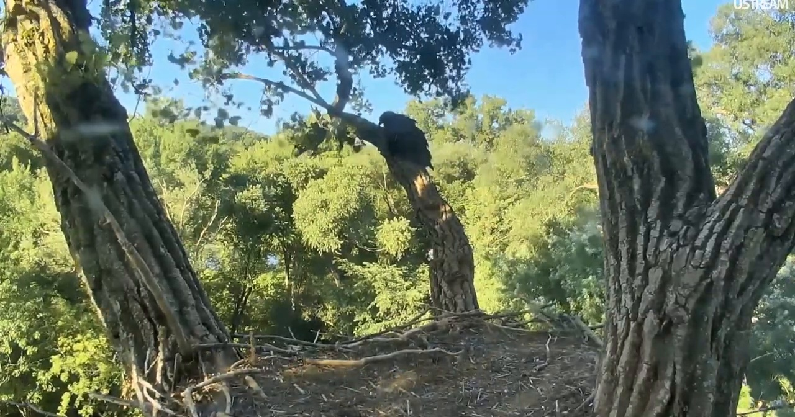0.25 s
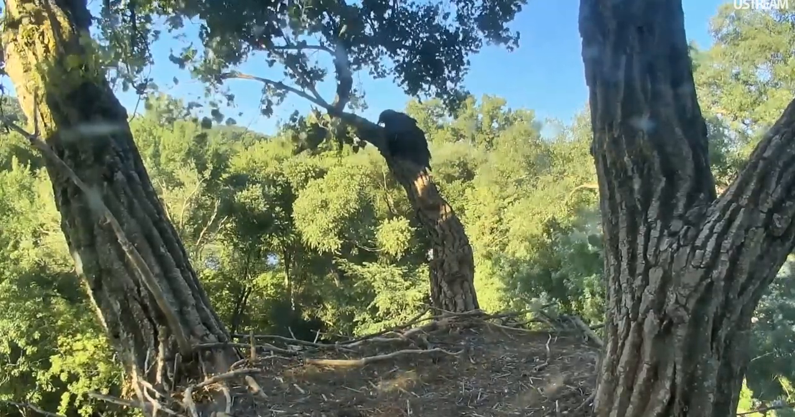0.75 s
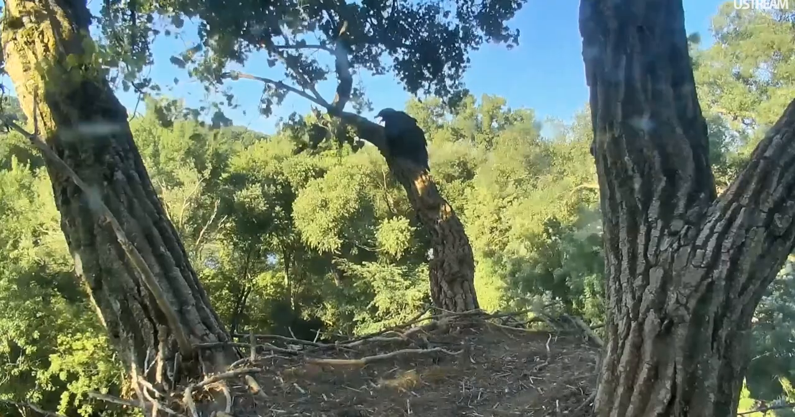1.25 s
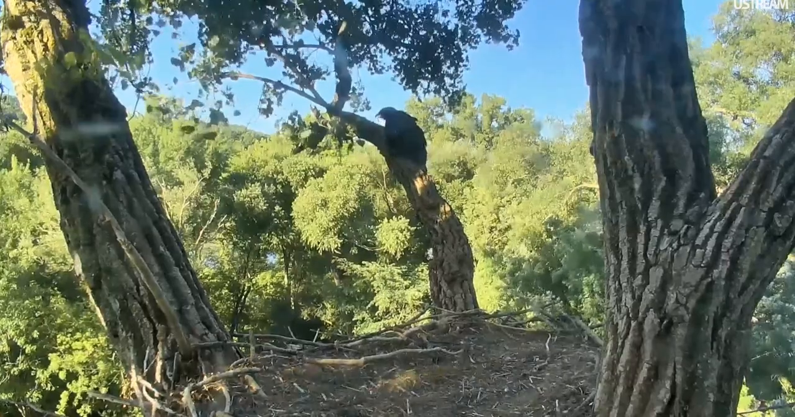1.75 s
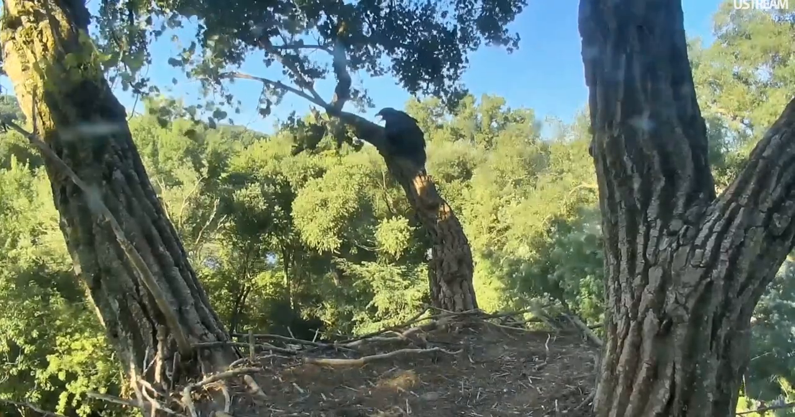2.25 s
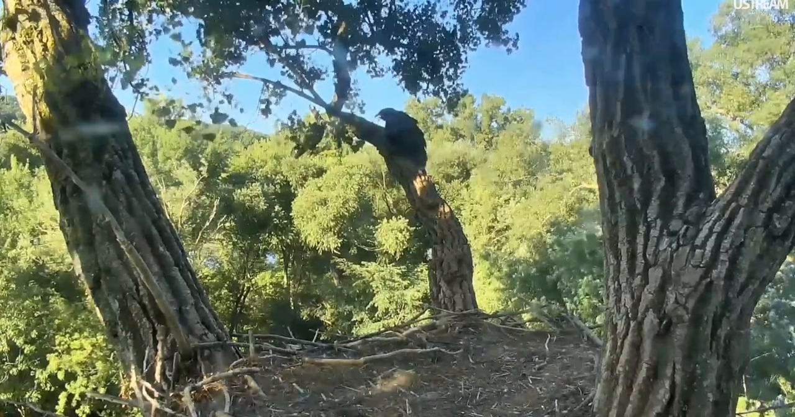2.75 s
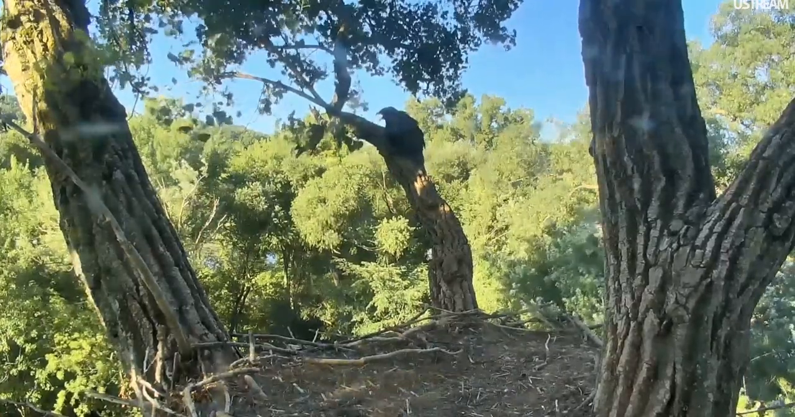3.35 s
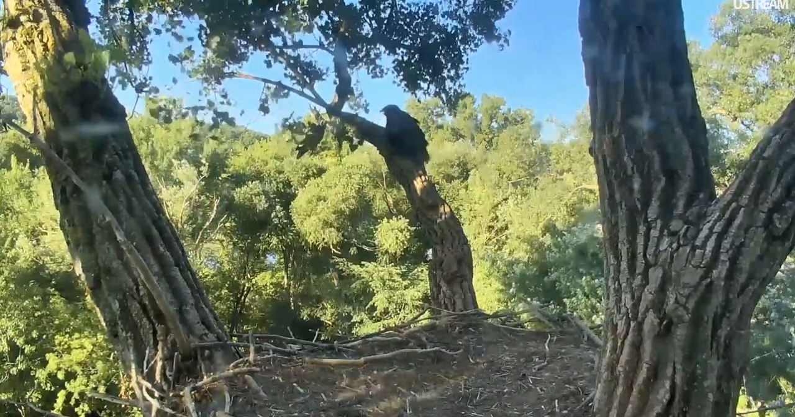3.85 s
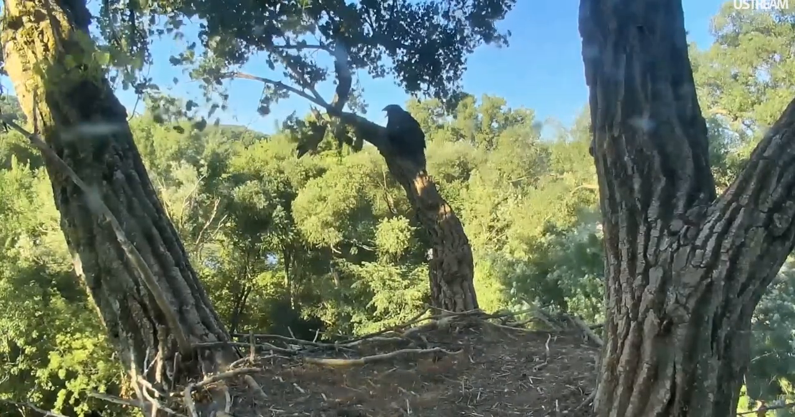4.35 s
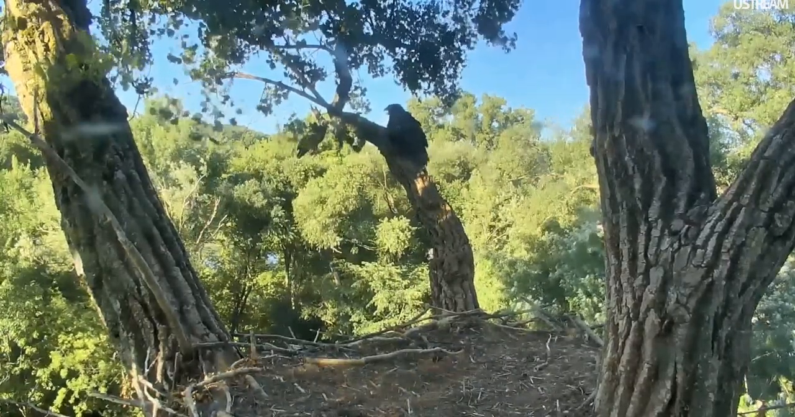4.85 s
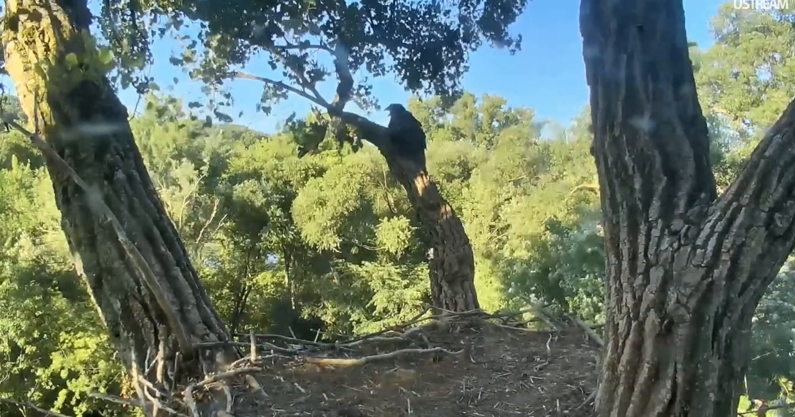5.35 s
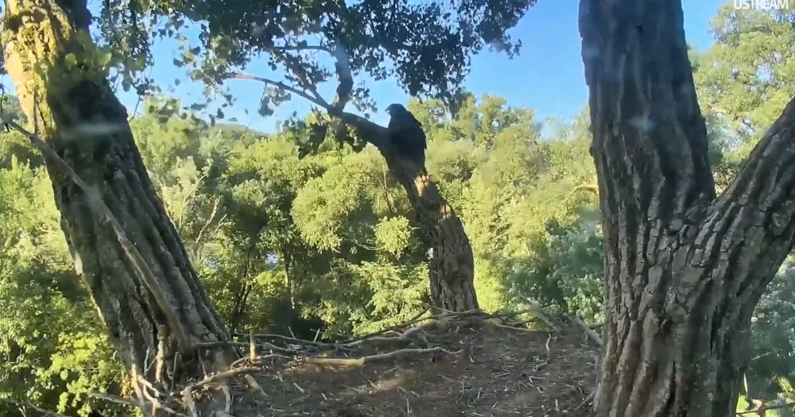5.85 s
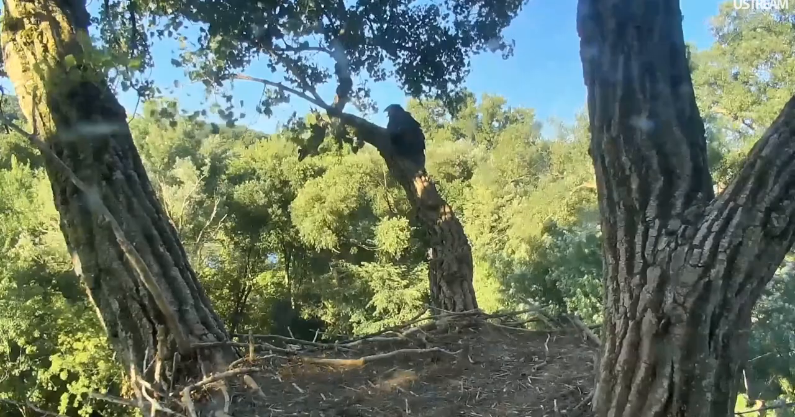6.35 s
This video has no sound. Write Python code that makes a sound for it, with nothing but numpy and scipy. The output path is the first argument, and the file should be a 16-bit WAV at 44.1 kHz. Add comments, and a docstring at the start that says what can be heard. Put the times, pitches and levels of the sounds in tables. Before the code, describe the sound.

From 0 to about 6.5 seconds, a small outdoor camera microphone hears constant broad airy hiss and a breathy, whistling hum near 1.7 kHz, wavering slightly and rising slowly, over a barely perceptible low drone. Young eagles beg from a nearby tree in alternating calls. Very short chips drop from just under 4 kHz at about 0.1, 0.9, 1.5, 2.1, 2.8, 3.5, 4.2, 4.9 and 5.8 seconds. Squeals answer at 0.4, 1.1, 1.7, 2.3, 3.0, 3.7, 4.4, 5.2 and 6.1, each 0.1 to 0.27 seconds, scooping upward into a thin held note near 3.9 kHz, then fading. Some are rough, others cleaner; the chip at 1.5 is loudest, and the last squeal is weak. Branches and farther trees return a soft half-second echo. Low-quality sampling adds gritty, metallic mirrored treble above the calls and hiss.

```python
"""At a nest, a camera's microphone hears broad outdoor air; its cavity rings as a whistling hum, over a faint low drone.
Young eagles beg from a tree near by: first a short falling chip, then a rising squeal, and so on in turn.
Each call comes direct and is then echoed by nearby branches and the trees beyond.
Last, the camera samples at 8 kHz: notes above 4 kHz fold back down, and the band is mirrored in the treble."""
import sys
import numpy as np
from scipy import signal
from scipy.fft import rfft, irfft, next_fast_len
from scipy.io import wavfile
from scipy.ndimage import map_coordinates

SR = 44100
rng = np.random.default_rng(int(sys.argv[2]) if len(sys.argv) > 2 else 0)


def wrap_up_sound(samples):
    """Save the sound to the file named by the first command line argument, as 16-bit audio."""
    columns = np.atleast_2d(samples).T
    # keep every value between -1 and 1, then stretch to whole-number steps
    tamed = np.clip(columns, -1, 1)
    steps = np.round(tamed * 32767).astype(np.int16)
    wavfile.write(sys.argv[1], SR, steps)


N = 291501

# Colour of the outdoor air at the microphone: (frequency [Hz], relative density [dB per Hz])
AIR_COLOUR = [(20, -21), (60, -16.5), (150, -12.5), (450, -11), (1000, -6.5), (1400, -2), (2000, 0.5),
              (2450, 0), (3000, -0.5), (3400, -2), (3750, -5.5), (4000, -8.5)]
# Chips, before the echo: (time [s], lead-in [s], fall [s], top pitch [Hz], end pitch [Hz],
#   crest level [dB], end level [dB], roughness [ratio])
CHIP_CALLS = [ (0.143, 0.0057, 0.0156, 3810, 3280, -35.5, -38.5, 0.92),
              (.869, 0.01, 0.014, 3900, 2780, -25.5, -32, 0.44),
              (1.508, .008, .018, 3900, 2616, -18.5, -30, 0.26),
              (2.106, .019, 0.018, 3880, 2840, -27.5, -35, 0.65),
              (2.777, .007, 0.0151, 3850, 3270, -26, -31, 0.8),
              (3.493, 0.00593, 0.013, 3756, 2850, -29.5, -30, 0.65),
              (4.168, 0.0062, .013, 3700, 2880, -33, -34.5, .6),
              (4.915, 0.0069, .028, 3650, 2380, -35, -34, 0.83),
              (5.757, 0.0056, 0.029, 3650, 2323, -35, -31.5, .65)]
# Squeals, before the echo: (time [s], scoop [s], whole length [s], start pitch [Hz], break pitch [Hz],
#   held pitch [Hz], settling time constant [s], crest position [share of the held note],
#   second harmonic in the scoop [dB], its crest in the held note [dB], fundamental in the scoop [dB],
#   scoop roughness [ratio], held roughness [ratio])
SQUEAL_CALLS = [ (0.369, .012, .19, 1540, 1848, 1999, .028, 0.44, -45, -33.5, -60, 0.4, 0.3),
                (1.101, .012, .16, 1503, 1600, 1925, .03, 0.19, -37, -42, -60, 1.1, 1.15),
                (1.673, .013, .27, 1328, 1446, 1927, .004, 0.46, -34, -36, -56, .85, .4),
                (2.317, 0.017, .1, 1406, 1641, 1950, 0.0074, 0.55, -26, -39.5, -53, 0.18, .55),
                (3.011, 0.021, .15, 1418, 1773, 1905, 0.033, 0.61, -32.5, -28, -55, 0.23, 0.22),
                (3.717, 0.049, .12, 1610, 1697, 1938, .015, .25, -36.5, -41.5, -54, 0.3, 0.9),
                (4.406, .048, 0.22, 1531, 1802, 1960, 0.00497, .25, -37.5, -39.5, -29.5, 0.22, 0.42),
                (5.196, .048, 0.17, 1658, 1773, 1946, .012, .2, -39, -41.5, -25.5, 0.2, 0.2),
                (6.126, 0.029, 0.24, 1610, 1873, 1977, .02, .45, -44.5, -44.5, -60, 0.3, 0.42)]
# Echo of the trees beyond: (frequency [Hz], time to decay by 60 dB [s])
FAR_TREES_T60 = [(1000, 0.28), (2500, 0.54), (4000, 0.65)]

AIR_DB, HUM_START_DB, DRONE_DB = -40.5, -38.5, -71  # background rms levels
HUM_RISE_DB_PER_S = 0.26
DRIFT_DB, DRIFT_RATE = 0.54, 2.5  # slow wavering of air and hum (dB, knots a second)
CHIP_SWELL_DB, CHIP_CREST_S, CHIP_REST_S = 12, 0.003, 0.0097  # crest time counts from the start of the fall
SCOOP_BEND = 0.75  # exponent: below 1 the scoop rises fastest at its start
BREAK_S = 0.012  # crossfade from the scoop into the held note
HOLD_FIRST_DB = -58  # the fundamental all but vanishes in the held note
HOLD_SWELL_DB, HOLD_FADE_DB = 3.5, 14  # rise to the crest of the held note, fall after it
WAVER_SHARE, WAVER_RATE = 0.003, 60  # trembling of a squeal (share of its pitch, knots a second)
CAMERA_HZ = 8000  # sampling rate of the camera
TOP_HZ = 14900  # nothing is heard above this


def amp(db):
    """Decibels to gain."""
    return 10 ** (np.asarray(db) / 20)


def unit(x):
    """Scale to rms 1."""
    return x / np.sqrt(np.mean(x ** 2) + 1e-20)


def along(points, hz):
    """Interpolate (Hz, value) points on a log frequency axis."""
    f, v = np.transpose(points)
    return np.interp(np.log(hz + 1), np.log(f), v)


def wobble(rate, size):
    """A smooth random curve through normal random values, rate knots a second."""
    knots = rng.standard_normal(int(size * rate / SR) + 4)
    return map_coordinates(knots, [np.arange(size) * rate / SR])


def noise(response):
    """Noise of rms 1 within the camera's band, coloured by a gain over frequency."""
    size = next_fast_len(N + 8192)
    hz = np.fft.rfftfreq(size, 1 / SR)
    spectrum = rfft(rng.standard_normal(size)) * response(hz)
    return unit(irfft(spectrum * (hz < CAMERA_HZ / 2), size)[:N])


def resonance(hz, centre_hz, width_hz):
    """Gain of one damped resonance, 1 at its centre."""
    return np.abs(hz * width_hz / (centre_hz ** 2 - hz ** 2 + 1j * hz * width_hz))


def outdoor_air():
    """Broad noise around the microphone, its level drifting slightly."""
    level_db = AIR_DB + DRIFT_DB * wobble(DRIFT_RATE, N)
    return amp(level_db) * noise(lambda hz: amp(along(AIR_COLOUR, hz)))


def cavity_hum():
    """The microphone cavity rings as a squared resonance on noise; the hum drifts and creeps up."""
    rising_db = HUM_START_DB + HUM_RISE_DB_PER_S * np.arange(N) / SR
    level_db = rising_db + DRIFT_DB * wobble(DRIFT_RATE, N)
    return amp(level_db) * noise(lambda hz: resonance(hz, centre_hz=1661.4, width_hz=319) ** 2)


def low_drone():
    """A faint drone: noise through a narrow, squared low resonance."""
    return amp(DRONE_DB) * noise(lambda hz: resonance(hz, centre_hz=83, width_hz=14) ** 2)


def add(track, s, sound):
    """Mix a sound into the track at time s."""
    start = round(s * SR)
    track[start:start + len(sound)] += sound[:N - start]


def syrinx(pitch, scatter, flutter_db, edge):
    """Phase and strength of a call: the membrane wavers in phase (scatter, radians) and size; edge s fades."""
    size = len(pitch)
    shake = wobble(800, size) + 1.66 * wobble(200.5, size)
    phase = 2 * np.pi * np.cumsum(pitch) / SR + scatter * shake
    t = np.arange(size) / SR
    nearest_end = np.minimum(t, t[::-1])
    gate = np.sin(np.pi / 2 * np.clip(nearest_end / edge, 0, 1)) ** 2
    return phase, np.sqrt(2) * gate * amp(flutter_db * wobble(160, size))


def wood(call, near_db, far_db, near_t60=0.13):
    """A direct call plus two noise-like echoes that build up and decay: nearby branches, trees beyond."""
    hz, t, z = signal.stft(rng.standard_normal((2, SR // 2)), SR, nperseg=256)
    t60s = np.full((len(hz), 1), near_t60), along(FAR_TREES_T60, hz)[:, None]
    decay = [amp(-60 * t / t60) for t60 in t60s]
    build_up = 1 - np.exp(-t / 0.029)
    near, far = signal.istft(z * decay * build_up, SR, nperseg=256)[1]
    paths = amp(near_db) * near / np.linalg.norm(near) + amp(far_db) * far / np.linalg.norm(far)
    paths[0] += 1  # the direct path
    return signal.fftconvolve(call, paths)


def chips():
    """Each chip is one shaky whistle that swells just below 4 kHz, drops steeply and rests on its lowest note."""
    out = np.zeros(N)
    for s, lead_s, fall_s, top_hz, end_hz, crest_db, end_db, rough in CHIP_CALLS:
        landing = lead_s + fall_s
        t = np.arange(int((landing + CHIP_REST_S) * SR)) / SR
        pitch = np.interp(t, [lead_s, landing], [top_hz, end_hz])
        level_db = np.interp(t, [0, lead_s + CHIP_CREST_S, landing],
                             [crest_db - CHIP_SWELL_DB, crest_db, end_db])
        phase, strength = syrinx(pitch, scatter=0.75 * rough, flutter_db=3.0 * rough, edge=0.0059)
        whistle = amp(level_db) * strength * np.sin(phase)
        add(out, s, wood(whistle, near_db=-7.5, far_db=-10.0))
    return out


def squeals(overtone_db):
    """A squeal scoops up, breaks to a high note and fades; harmonic 2 leads unless the throat opens on 1."""
    out = np.zeros(N)
    for (s, scoop_s, length, start_hz, break_hz, held_hz, settle_s, crest,
         scoop_db, held_db, open_db, scoop_rough, held_rough) in SQUEAL_CALLS:
        t = np.arange(int(length * SR)) / SR
        since_break = np.maximum(t - scoop_s, 0)
        risen = np.minimum(t / scoop_s, 1) ** SCOOP_BEND
        settled = 1 - np.exp(-since_break / settle_s)
        pitch = start_hz + (break_hz - start_hz) * risen + (held_hz - break_hz) * settled
        pitch = pitch * (1 + WAVER_SHARE * wobble(WAVER_RATE, len(t)))

        held = np.minimum(since_break / BREAK_S, 1)  # 0 in the scoop, 1 in the held note
        arch_db = np.interp(since_break / (length - scoop_s), [0, crest, 1],
                            [-HOLD_SWELL_DB, 0, -HOLD_FADE_DB])
        first_db = (1 - held) * open_db + held * HOLD_FIRST_DB
        second_db = (1 - held) * scoop_db + held * (held_db + arch_db)
        rough = (1 - held) * scoop_rough + held * held_rough
        phase, strength = syrinx(pitch, scatter=0.88 * rough, flutter_db=2.0, edge=0.0028)

        reedy = np.clip((1650 - pitch) / 200, 0, 1)  # low pitches add the fourth harmonic
        fundamental = amp(first_db) * np.sin(phase)
        upper = amp(second_db) * (np.sin(2 * phase) + reedy * amp(overtone_db) * np.sin(4 * phase))
        add(out, s, wood(strength * (fundamental + upper), near_db=-7.5, far_db=-8.5))
    return out


def scene():
    """The background at the nest, with the eagles calling over it."""
    background = outdoor_air() + cavity_hum() + low_drone()
    return (background + chips() + squeals(overtone_db=-12))[None]


def record(dry, image_slope=2.385, image_narrowing=3.11):
    """Sampling folds notes above 4 kHz down; rough interpolation mirrors the band upward, ever weaker."""
    seconds, fold_hz = N // SR + 2, CAMERA_HZ / 2
    samples = map_coordinates(dry[0], [np.arange(seconds * CAMERA_HZ) * SR / CAMERA_HZ])
    hz = np.fft.rfftfreq(seconds * SR, 1 / SR)
    # the spectrum of the samples repeats at every multiple of the sampling rate
    mirrored = np.fft.fft(samples)[np.arange(len(hz)) % len(samples)] * SR / CAMERA_HZ
    source_hz = np.abs((hz + fold_hz) % CAMERA_HZ - fold_hz)
    # notes close to the fold leak most into the mirror images
    nearness = (source_hz / fold_hz) ** image_narrowing
    leak = nearness * (fold_hz / np.maximum(hz, fold_hz)) ** image_slope
    return irfft(mirrored * np.where(hz < fold_hz, 1, leak) * (hz < TOP_HZ))[None, :N]


dry = scene()
out = record(dry)
wrap_up_sound(out)
```